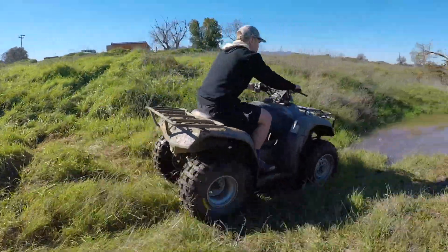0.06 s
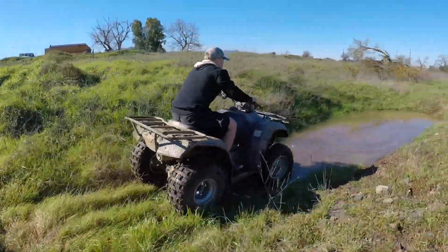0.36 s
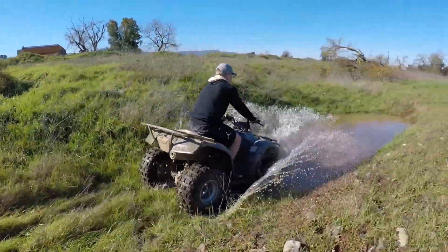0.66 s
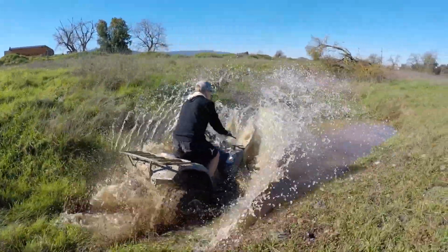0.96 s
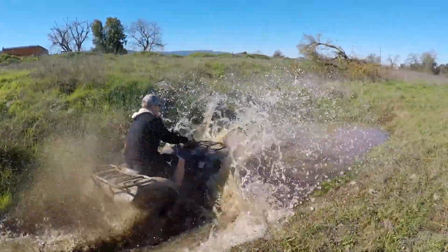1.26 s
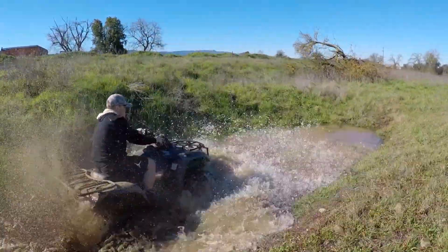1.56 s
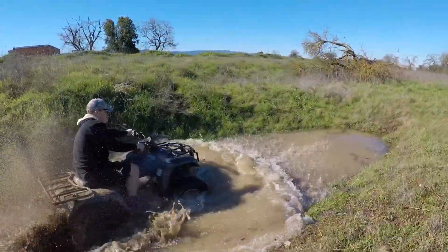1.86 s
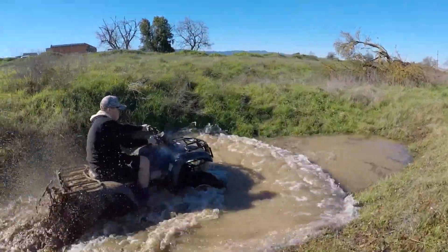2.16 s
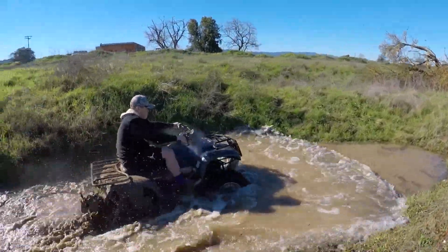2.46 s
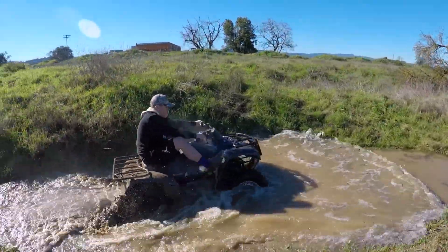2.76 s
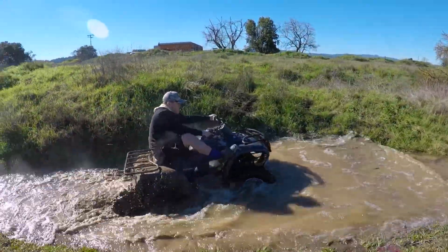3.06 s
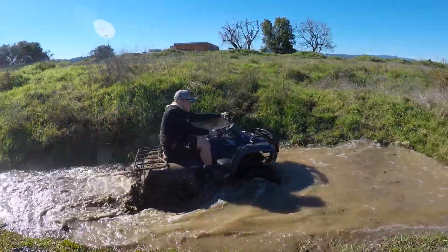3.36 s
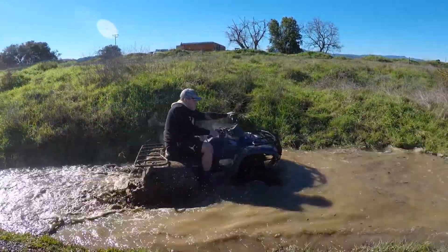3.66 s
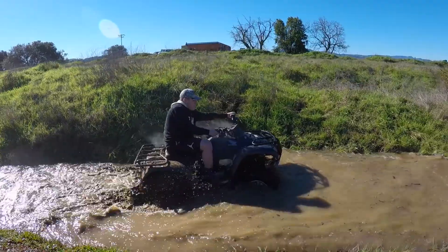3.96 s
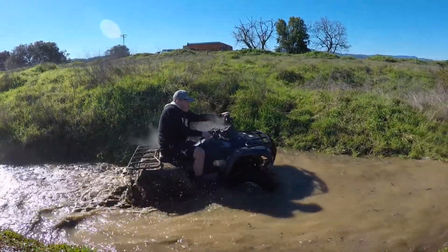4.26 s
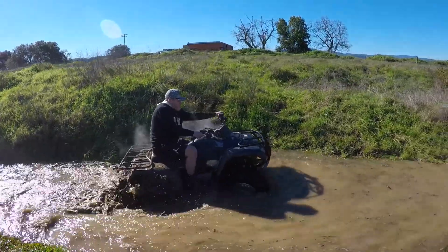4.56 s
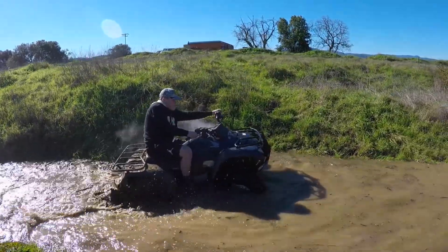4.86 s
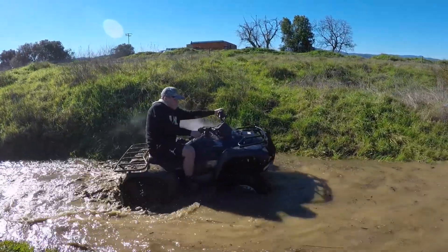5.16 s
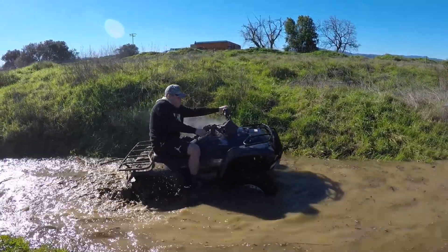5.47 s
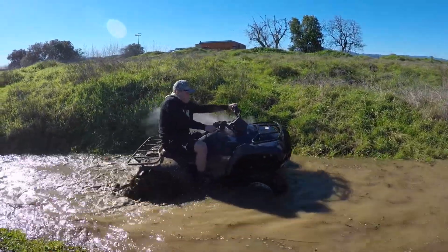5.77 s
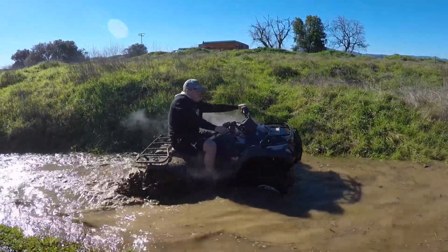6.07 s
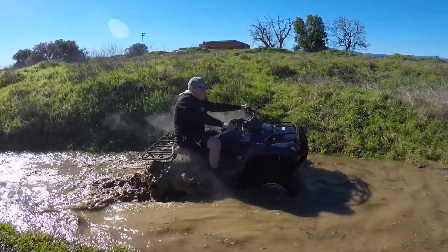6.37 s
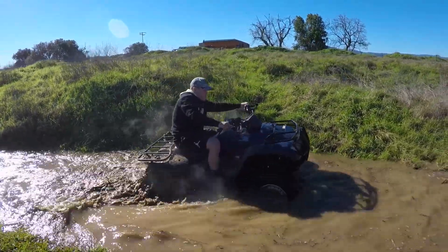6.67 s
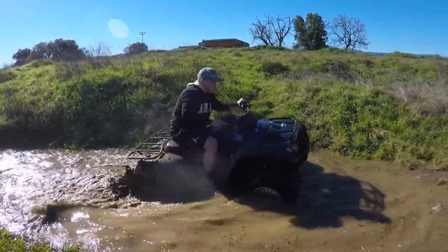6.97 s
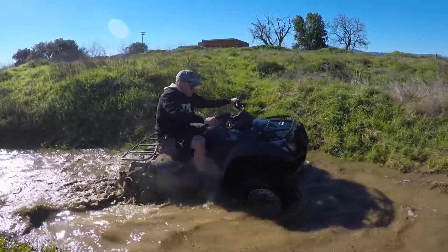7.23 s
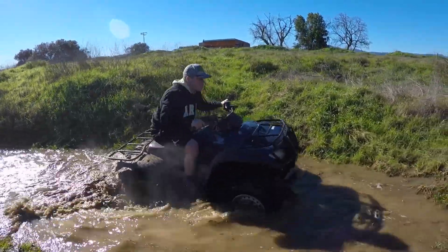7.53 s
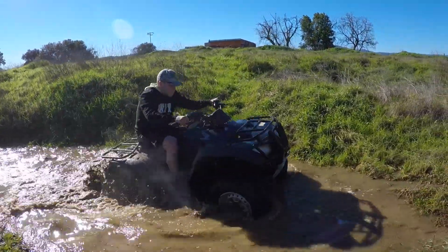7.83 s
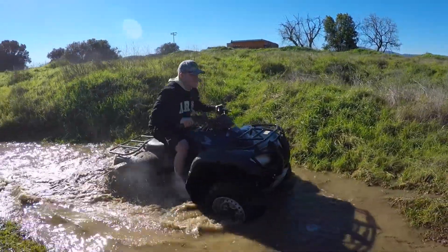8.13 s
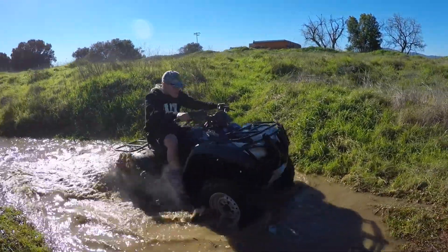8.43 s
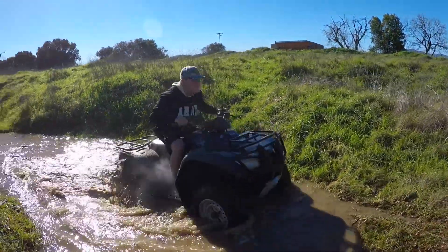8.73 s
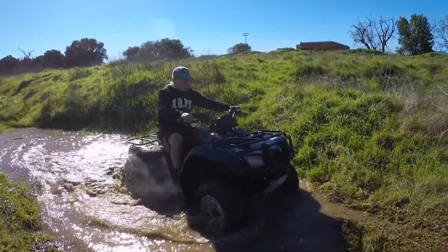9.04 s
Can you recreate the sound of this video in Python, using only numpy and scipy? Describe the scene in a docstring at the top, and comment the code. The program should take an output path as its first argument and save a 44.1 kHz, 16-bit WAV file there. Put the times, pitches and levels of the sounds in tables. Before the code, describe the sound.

A single-cylinder quad bike engine charges into water with a spray, then bogs and surges repeatedly, its wet exhaust burbling over churning water.

```python
"""A muddy pond outdoors: a single-cylinder quad bike charges in and labours through it, close by.
Each firing booms in the silencer, burbles out of the pipe, spits rasp and hiss and rattles the metalwork.
The tyres crunch over grass, the plunge throws up spray, then the wheels keep the water sloshing.
The engine surges and barks on each stab of throttle and bogs between them; the wet pipe coughs,
and gulps four times in deep water."""
import sys
import numpy as np
from scipy import signal
from scipy.fft import rfft, irfft
from scipy.io import wavfile
from scipy.ndimage import uniform_filter1d, minimum_filter1d

SR = 44100
rng = np.random.default_rng(int(sys.argv[2]) if len(sys.argv) > 2 else 0)


def materialize(psi):
    """Save the field psi as 16-bit PCM at rate SR to the path in sys.argv[1].

    A 1-D psi becomes a single channel; in a 2-D psi each row is a channel.
    """
    bounded = np.clip(np.atleast_2d(psi).T, -1, 1)
    quanta = np.round(bounded * 32767).astype(np.int16)
    wavfile.write(sys.argv[1], SR, quanta)


N = 410130
T = np.arange(N) / SR
HZ = np.fft.rfftfreq(N, 1 / SR)

# how far the pipe is clear of the water: (time [s], share [0-1])
PIPE_CLEAR = [(0, 0.44), (.6, 0.6), (1.3, 0.76), (1.9, 0.3), (2.2, 0.18)]
# resonances that come and go as the bike turns:
# (time [s], whistle level [dB], engine case level [dB], clatter gain [dB], drone gain [dB])
RESONANCES = [(0, -70, -46, 5.5, 1.5), (2, -64, -56, 5, -3), (3.2, -51, -49.5, 5, -3.5),
              (5.4, -50, -51.5, 3.5, 3), (5.9, -39.5, -46, 1, -2.5), (6.6, -41, -49, -0.5, -0.5),
              (7, -47, -52, -5, 2), (8.45, -48.5, -42, -2, 5.5), (9.3, -47, -46.5, 0, 5.5)]
# the throaty colour of the pipe: (frequency [Hz], relative level [dB])
THROAT_EQ = [(150, -32), (220, -2.5), (310, -0.5), (390, -3), (440, -7), (500, -16), (580, -15),
             (1000, -56)]
# the sizzle of the finest drops: (frequency [Hz], relative level [dB])
MIST_EQ = [(5000, -18), (8000, -1), (9500, -4), (11300, -7), (12100, 4), (13500, -1), (15200, 3.5)]
# the exhaust gulps in the water: (centre time [s], length [s], level [dB])
PIPE_GULPS = [(4.592, 0.13, -11), (5.183, 0.17, -11), (6.849, 0.089, -10.5), (7.26, .11, -14)]


def from_db(db):
    """Decibels to gain."""
    return 10 ** (np.asarray(db) / 20)


def unit(x):
    """Scales to an rms of 1."""
    return x / np.sqrt(np.mean(x ** 2) + 1e-20)


def curves(rows):
    """One automation curve for each value column of a timed table."""
    times, *columns = np.transpose(rows)
    return [np.interp(T, times, column) for column in columns]


def gain_at(spectrum, hz):
    """Reads an EQ curve's gain on a log-frequency axis."""
    freqs, db = np.transpose(spectrum)
    return from_db(np.interp(np.log(hz + 1), np.log(freqs + 1), db))


def colour(x, spectrum):
    """Shapes a sound with an EQ curve, at an rms of 1."""
    return unit(irfft(rfft(x) * gain_at(spectrum, HZ), N))


def drift(hz):
    """Random wander up to about the given rate, at an rms of 1."""
    return unit(irfft(rfft(rng.standard_normal(N)) / (1 + (HZ / hz) ** 4), N))


def ring(x, hz, width):
    """One resonance, at an rms of 1."""
    r = np.exp(-np.pi * width / SR)
    return unit(signal.lfilter([1, 0, -1], [1, -2 * r * np.cos(2 * np.pi * hz / SR), r * r], x))


def steep_ring(x, hz, width):
    """A resonance with steep skirts."""
    return ring(ring(x, hz, width), hz, 4 * width)


def puffs(cycles, rise, fall, bed, uneven_db):
    """Noise that jumps above a steady bed at each firing; rise and fall are in firing cycles."""
    firing, age = np.floor(cycles).astype(int), cycles % 1
    strength = from_db(uneven_db * rng.standard_normal(N))[firing]
    burst = (1 - np.exp(-age / rise)) * np.exp(-age / fall)
    return (bed + unit(burst * strength)) * rng.standard_normal(N)


def grains(per_s, spread_db):
    """Sparse clicks of uneven size."""
    size = from_db(spread_db * np.minimum(rng.exponential(1, N), 4))
    return size * rng.standard_normal(N) * (rng.random(N) < per_s / SR)


def boom(cycles, speed, stab_db, silencer_hz=105, wander_db=1.17, fifth_db=-3):
    """The five lowest firing orders sweep through the silencer's peaks and dips as the speed changes."""
    # the silencer's response, pipe under water: (frequency [Hz], level [dB])
    wet_eq = [(39, -21), (45, -19.5), (52, -27.5), (80, -17), (88, -13.5), (102, -9.5), (118, -16.5),
              (130, -21), (138, -26), (145, -36.5), (154, -39.5), (163, -26.5), (175, -27.5), (188, -33.5),
              (206, -24.5), (222, -28.5), (240, -36.5), (260, -33)]
    # and with the pipe in the air: (frequency [Hz], level [dB])
    air_eq = [(50, -18.5), (72, -16.5), (102, -15.5), (116, -10.5), (141, -13), (152, -48), (165, -28),
              (200, -27), (232, -33), (272, -22.5), (300, -29), (350, -29)]
    stab_shares, drone_shares = (0, .08, .35, .2, .4), (0, -.35, 0, 1.1, .3)  # one for each order
    clear = np.clip(curves(PIPE_CLEAR)[0] / np.max(PIPE_CLEAR, axis=0)[1], 0, 1)
    drone_db = curves(RESONANCES)[3]
    note = np.zeros(N)
    for k, (stab_share, drone_share) in enumerate(zip(stab_shares, drone_shares), 1):
        hz = k * speed
        level = (1 - clear) * gain_at(wet_eq, hz) + clear * gain_at(air_eq, hz)
        lift_db = stab_share * stab_db + drone_share * drone_db
        lift_db += (k > 2) * wander_db * drift(6.8) + (k == 5) * fifth_db
        # orders near the resonance are delayed, so it rings on between firings
        lag = 2 * np.arctan(2 * (hz / silencer_hz - silencer_hz / hz))
        phase = np.pi / 14 - np.maximum(lag, -2 * np.pi / 3) if k <= 3 else (5 - k) * np.pi / 5
        note += from_db(lift_db) * level * np.cos(2 * np.pi * k * cycles + phase)
    return np.sqrt(2) * note


def bark(cycles, speed, stab_db, eased_db=-38, flutter=0.24, wander_db=1.75, smear=0.15):
    """The high orders bark under throttle; the pipe delays the highest more, smearing each pulse."""
    # weight of an order at each pitch: (frequency [Hz], gain [dB])
    bark_eq = [(170, 0), (240, 1.5), (300, 3.5), (360, 1.5), (395, 1.5), (440, -23.5), (500, -20.5),
               (580, -52), (800, -46)]
    orders = range(6, 15)
    pulses = np.zeros(N)
    for k in orders:
        level = gain_at(bark_eq, k * speed) * from_db(wander_db * drift(4.2))
        pulses += level * np.cos(2 * np.pi * k * cycles - smear * (k - orders[0]) ** 2)
    return from_db(eased_db + stab_db) * pulses * (1 + flutter * drift(13))


def burble(cycles, stab_db, low_trim_db=-1, throat_trim_db=-2, low_duck=0.26, throat_duck=0.28):
    """Gas leaves the wet pipe in uneven low puffs; a stab of throttle blows it clearer."""
    # the burble's two faders, before trim: (time [s], low level [dB], throaty level [dB])
    faders = [(0, -13.5, -20.5), (1, -14.5, -22), (2, -19.5, -32.5), (2.5, -18.5, -32.5),
              (3.05, -24, -34.5), (3.8, -22.5, -34), (4.9, -17.5, -30.5), (5.5, -19, -29), (6.7, -21, -36),
              (7.5, -19, -31.5), (8.8, -17.5, -30.5), (9.3, -18.5, -30)]
    # the low puffs' rumble: (frequency [Hz], relative level [dB])
    low_eq = [(8, -10), (22, -1), (60, 1), (130, -1), (200, -3), (260, -14), (400, -32.5), (600, -64)]
    low_db, throat_db = curves(faders)
    gas = puffs(cycles, rise=0.14, fall=1.0, bed=0.85, uneven_db=2.0)
    rush = puffs(cycles, rise=0.096, fall=1.0, bed=0.55, uneven_db=3.0)
    low = from_db(low_db + low_trim_db - low_duck * stab_db) * colour(gas, low_eq)
    throat = from_db(throat_db + throat_trim_db - throat_duck * stab_db) * colour(rush, THROAT_EQ)
    return low + throat


def clatter(cycles, stab_db, trim_db=-2.0, stab_share=0.37):
    """Each firing knocks the metal parts and a loose panel, harder under throttle."""
    # ringing metal parts: (frequency [Hz], width [Hz], relative level [dB])
    modes = [(1438, 23, -15.5), (1633, 82, -14.5), (1896, 160, -19.5), (3370, 140, -16), (3704, 90, -20.5),
             (4410, 160, -19.5)]
    # the panel rattles most in mid-pond: (time [s], relative level [dB])
    panel_fader = [(0, -16), (4.2, -17), (4.8, -10.5), (5.7, -5.5), (6.4, -13), (9.3, -20)]
    knocks = puffs(cycles, rise=.02, fall=0.068, bed=0.29, uneven_db=3.0)
    parts = sum(from_db(db) * ring(knocks, hz, width) for hz, width, db in modes)
    parts *= from_db(curves(RESONANCES)[2])
    panel = from_db(curves(panel_fader)[0]) * ring(knocks, hz=1885, width=32)
    return (parts + panel) * from_db(trim_db + stab_share * stab_db)


def blast(cycles, stab_db, rasp_trim_db=-1, hiss_trim_db=-1.63, hiss_share=0.76, grit_db=2):
    """Each firing spits gritty rasp, clatter and hiss; a pipe clear of the water chuffs more crisply."""
    # faders with the throttle eased, before trim: (time [s], rasp level [dB], hiss level [dB])
    faders = [(0, -38.5, -35), (.24, -38, -37.5), (.38, -34, -31.5), (.64, -35, -31.5), (.8, -34.5, -25.5),
              (1.25, -41, -28), (1.9, -38, -36), (2.2, -46, -43.5), (3.5, -41.7, -41), (6.1, -40.5, -39),
              (7, -42.5, -39), (8.3, -40.5, -42), (9.3, -38.5, -41.5)]
    # the midrange rasp: (frequency [Hz], relative level [dB])
    rasp_eq = [(350, 4), (560, -6), (730, 1.5), (900, -3.5), (1150, -10.5), (1450, 2), (1850, 2.5),
               (2200, -2.5), (2600, -2), (3100, -7.5), (5000, -55)]
    # the top-end hiss: (frequency [Hz], relative level [dB])
    hiss_eq = [(1800, -58), (3100, -10), (3700, -7.5), (4100, -7), (4450, -1.5), (4900, -4), (5400, 3.5),
               (6900, -1), (7600, -7), (8600, -11.5), (9300, -20.5), (11300, -27.5), (12100, -21),
               (15200, -44)]
    # bright resonances of the clear pipe: (frequency [Hz], width [Hz], relative level [dB])
    pipe_modes = [(1840, 600, -7), (3740, 230, -8), (5180, 100, -13), (5680, 240, -12), (6670, 83, -16),
                  (8100, 250, -23)]
    rasp_db, hiss_db = curves(faders)
    clear = np.clip(curves(PIPE_CLEAR)[0], 0, 1)
    early = cycles + 0.098  # the spit leads the boom, and more so from a clear pipe
    wet_gas = puffs(early, rise=0.12, fall=0.3, bed=1.0, uneven_db=3.0) * from_db(grit_db * drift(600))
    dry_gas = puffs(early + 0.18, rise=0.26, fall=0.18, bed=0.24, uneven_db=0.0)
    gas = np.sqrt(1 - clear) * unit(wet_gas) + np.sqrt(clear) * unit(dry_gas)
    pipe = sum(from_db(db) * steep_ring(gas, hz, width) for hz, width, db in pipe_modes)
    rasp = from_db(rasp_db + rasp_trim_db + stab_db) * (colour(gas, rasp_eq) + clatter(early, stab_db))
    hiss = from_db(hiss_db + hiss_trim_db + hiss_share * stab_db) * (colour(gas, hiss_eq) + clear * pipe)
    return rasp + hiss


def reflections(x):
    """Close echoes comb the sound."""
    # bounces off the water and the bodywork: (delay [ms], gain [linear])
    taps = [(1.9, 0.061), (3.4, -0.011), (5.7, -0.0038), (8.3, 0.14)]
    return x + sum(gain * np.interp(T - ms / 1000, T, x, left=0) for ms, gain in taps)


def whistle_and_case(cycles, flutter_db=1.5):
    """The hiss whistles unevenly, and the engine case rings under the firings."""
    whistle_db, case_db, *_ = curves(RESONANCES)
    drive = puffs(cycles, rise=0.05, fall=0.42, bed=0.46, uneven_db=2.0)
    whistle = from_db(whistle_db + flutter_db * drift(16)) * steep_ring(drive, hz=6930, width=170)
    return whistle + from_db(case_db) * steep_ring(drive, hz=728, width=48)


def plunge(hit_s=.62, rise_s=.2, fade_after_s=.55, fall_db_per_s=28, grass_db=-43, mist_db=-49):
    """The tyres crunch down the bank until they hit the water, which bursts into fine drops."""
    # tyres crushing grass: (frequency [Hz], relative level [dB])
    grass_eq = [(300, -17), (600, 5), (1000, 11), (1400, -13), (2800, -3), (6000, -38)]
    age = T - hit_s
    in_water = np.clip(age / rise_s, 0, 1)
    fade_db = fall_db_per_s * np.maximum(age - fade_after_s, 0)
    grass = from_db(grass_db) * colour(grains(per_s=3400, spread_db=4.3), grass_eq)
    mist = from_db(mist_db - fade_db) * colour(grains(per_s=5000, spread_db=3), MIST_EQ)
    return (1 - in_water) * grass + in_water * mist


def bubbles(pitches=36, each_per_s=9):
    """Trapped air rings as short blips that rise in pitch."""
    size = from_db(3.5 * np.minimum(rng.exponential(1, N), 4))
    blips = np.zeros(N)
    for hz in np.geomspace(800, 5500, pitches):
        periods = hz * np.arange(2048) / SR
        envelope = np.exp(-periods / 9) * (1 - np.exp(-periods))
        blip = envelope * np.sin(2 * np.pi * periods * (1 + 0.0011 * periods))
        onsets = size * (rng.random(N) < each_per_s / SR)
        blips += signal.oaconvolve(onsets, blip)[:N]
    return unit(blips)


def splash(stab_db, churn=0.22, slosh_db=1.4, bubble_mix_db=-10, sparkle_mix_db=-27, sparkle_share=1.1):
    """The wheels churn the water into drops and bubbles, with a finer sparkle under throttle."""
    # water thrown by the wheels: (time [s], base level [dB])
    fader = [(0, -35.5), (.55, -48), (.78, -36), (1.2, -37), (2.3, -43), (4.5, -42), (5.5, -45.5),
             (6.2, -40), (7.2, -42.5), (8.4, -38.5), (9.3, -39)]
    # the body of the spray: (frequency [Hz], relative level [dB])
    spray_eq = [(250, -16), (700, 5), (1000, 9), (1700, 6), (2600, 2.5), (3700, -1), (4500, 2.5),
                (5700, 2.5), (6800, -1), (8500, -6), (9400, -16.5), (15000, -31)]
    drops = unit(grains(per_s=2500, spread_db=2.4))
    spray = colour(drops + rng.standard_normal(N), spray_eq)
    bubbling = from_db(bubble_mix_db) * bubbles()
    fine_drops = colour(grains(per_s=500, spread_db=4.5), MIST_EQ)
    sparkle = from_db(sparkle_mix_db + sparkle_share * stab_db) * fine_drops
    level = from_db(curves(fader)[0] + churn * stab_db + slosh_db * drift(4.9))
    return level * (spray + sparkle + bubbling)


def coughs(rise_s=.003, fall_s=0.014):
    """The wet pipe coughs out single throaty puffs."""
    # cough cues: (time [s], gain [dB])
    cues = [(2.41, -20), (2.766, -28), (3.32, -25), (3.385, -23), (8.3, -30), (8.37, -18)]
    ages = [(np.maximum(T - start, 0), db) for start, db in cues]
    level = sum(from_db(db) * (1 - np.exp(-age / rise_s)) * np.exp(-age / fall_s) for age, db in ages)
    return level * colour(rng.standard_normal(N), THROAT_EQ)


def throttle(ramp_s=0.081, inertia_s=.17):
    """Each stab lifts the rasp and bark at once; the engine's speed lags behind."""
    # stabs in the water: (start [s], length [s], pull [firings/s], rasp gain [dB], bark gain [dB])
    stabs = [(2.417, 0.17, 6.05, 4.5, -0.5), (2.651, 0.2, 5.4, 6.5, 2.2), (2.853, 0.28, 11.2, 5.5, 7),
             (3.257, 0.17, 8.5, 4, 4.5), (3.629, 0.14, 10.5, 4, 6), (3.828, 0.2, 13.7, 7.5, 4),
             (4.141, 0.15, 11.2, 6, 5), (4.356, 0.25, 6.8, 3.5, 5.5), (4.663, 0.21, 13.4, 6, 5),
             (4.978, 0.17, 11.8, 5.5, 8.2), (5.282, 0.18, 8.16, 6.5, 12), (5.579, 0.31, 10.14, 6.5, 7.5),
             (5.959, 0.31, 11.6, 7.5, 5.5), (6.46, 0.32, 15.7, 5.5, 4.5), (6.97, 0.21, 9.9, 5, 6),
             (7.368, 0.28, 8.6, 7, 9), (7.82, 0.32, 7.04, 5.5, 5.5), (8.261, 0.36, 10.65, 4, -1),
             (8.819, 0.14, 5.9, 1, -3), (9.011, 0.18, 5.96, 0.5, -2)]
    added = np.zeros((3, N))
    for start, length, *amounts in stabs:
        opening = np.clip((T - start) / ramp_s + .5, 0, 1)
        closing = np.clip((start + length - T) / ramp_s + .5, 0, 1)
        added += np.outer(amounts, opening * closing)
    pull, rasp_db, bark_db = added
    pole = np.exp(-1 / (inertia_s * SR))
    return signal.lfilter([1 - pole], [1, -pole], pull), rasp_db, bark_db


def swell(centre, length):
    """A half-sine envelope."""
    return np.cos(np.pi * np.clip((T - centre) / length, -.5, .5))


def gulps(bubble_hz=108, wobble=.2):
    """Big exhaust bubbles throb at an unsteady pitch."""
    level = sum(from_db(db) * swell(centre, length) for centre, length, db in PIPE_GULPS)
    pitch = bubble_hz * (1 + wobble * drift(42.6))
    return level * unit(np.sin(2 * np.pi * np.cumsum(pitch) / SR))


def choke(depth=0.39):
    """Each gulp smothers the exhaust note for a moment."""
    return 1 - depth * sum(swell(centre, length) for centre, length, _ in PIPE_GULPS)


def scene():
    """The throttle drives the crank, the crank drives the engine's voices; water splashes around them."""
    # revs without the stabs: the charge, then the drag of deep water: (time [s], speed [firings/s])
    base_speed = [(0.0, 48.4), (0.08, 51.8), (0.25, 52.1), (0.42, 55.7), (0.7, 56.7), (0.87, 65.5),
                  (1.1, 70.0), (1.28, 70.7), (1.55, 59.5), (1.8, 55.9), (2.1, 53.5), (2.33, 44.8),
                  (3.1, 42.0), (4.4, 38.1), (5.25, 35.0), (6.45, 42.0), (6.9, 35.8), (9.3, 39.8)]
    surge, rasp_stab_db, bark_stab_db = throttle()
    speed = curves(base_speed)[0] + surge
    cycles = np.cumsum(speed) / SR + .5 + 0.0025 * drift(23)  # firings so far, with slight jitter
    note = choke() * (boom(cycles, speed, bark_stab_db) + bark(cycles, speed, bark_stab_db))
    exhaust = note + burble(cycles, bark_stab_db) + gulps() + coughs()
    engine = exhaust + reflections(blast(cycles, rasp_stab_db)) + whistle_and_case(cycles)
    return (engine + plunge() + splash(rasp_stab_db))[None]


def record(dry):
    """The camera's case notches the sound, a fast limiter holds the peaks, a low-pass trims the top."""
    # narrow bands that the case cancels: (frequency [Hz], width [Hz], gain [dB])
    notches = [(562.5, 37.6, -14), (1093, 98, -9.5), (2867, 216, -7)]
    ceiling, cutoff_hz = .88, 15250
    case_db = sum(db * np.exp(-((HZ - hz) / width) ** 2) for hz, width, db in notches)
    notched = irfft(rfft(dry[0]) * from_db(case_db), N)
    safe_gain = np.minimum(1, ceiling / (abs(notched) + 1e-9))
    limited = notched * uniform_filter1d(minimum_filter1d(safe_gain, size=500), size=500)
    low_pass = signal.firwin(2047, cutoff_hz, window=("kaiser", 9), fs=SR)
    return signal.oaconvolve(limited, low_pass, "same")[None]


dry = scene()
out = record(dry)
materialize(out)
```